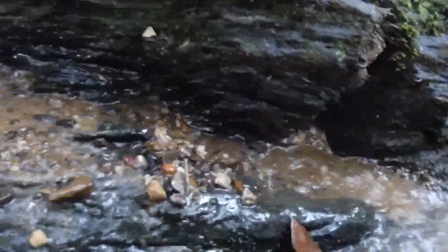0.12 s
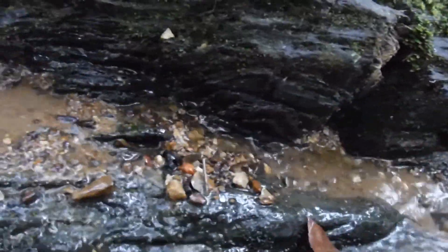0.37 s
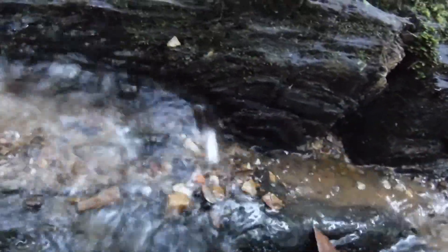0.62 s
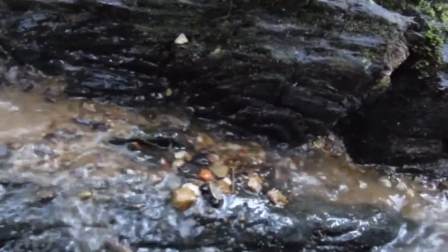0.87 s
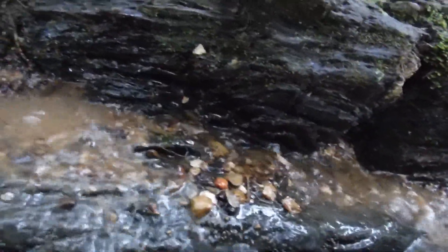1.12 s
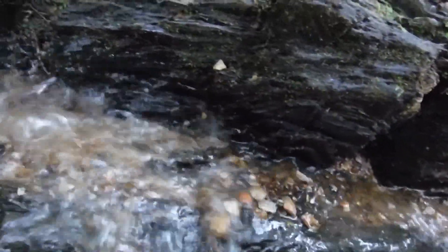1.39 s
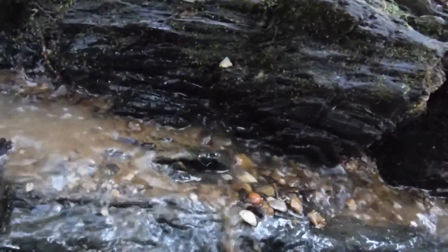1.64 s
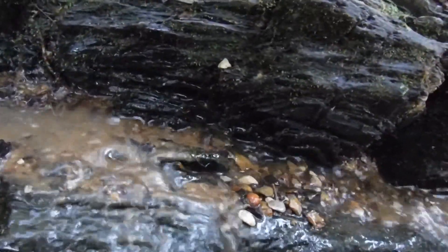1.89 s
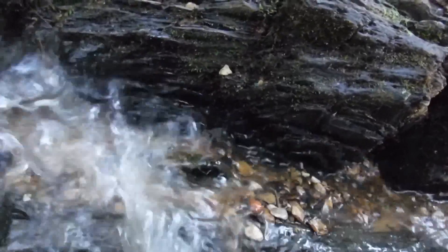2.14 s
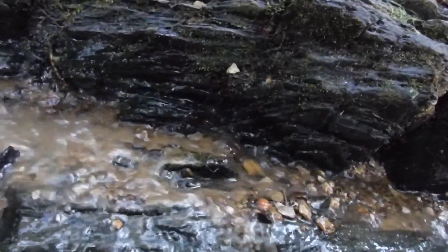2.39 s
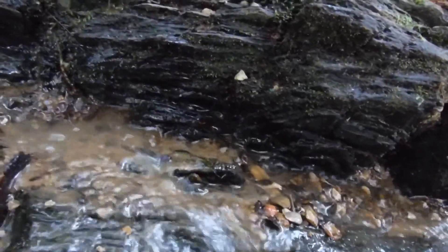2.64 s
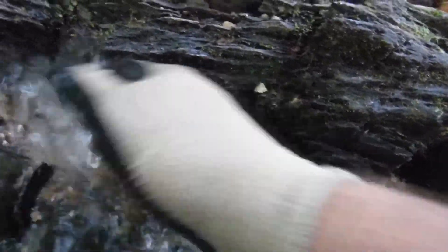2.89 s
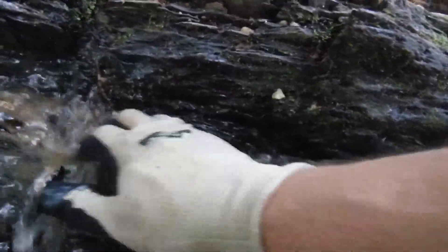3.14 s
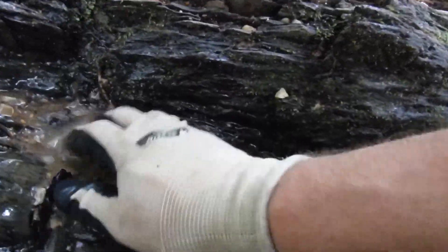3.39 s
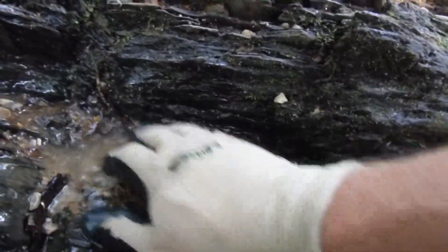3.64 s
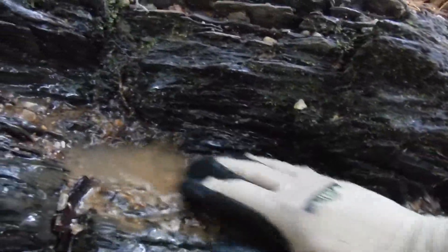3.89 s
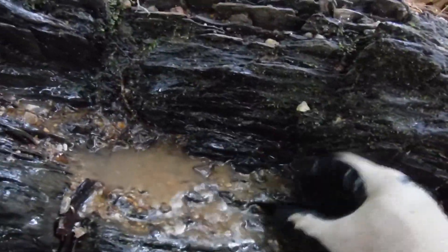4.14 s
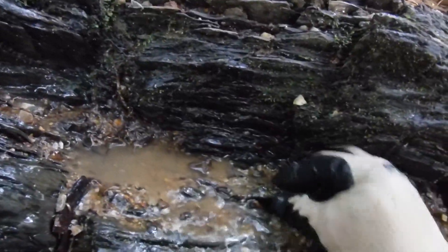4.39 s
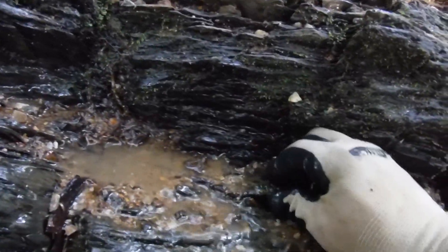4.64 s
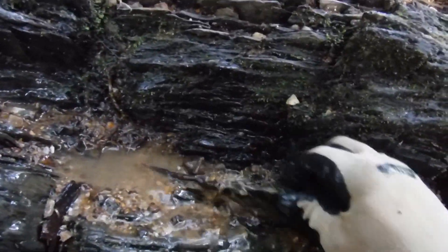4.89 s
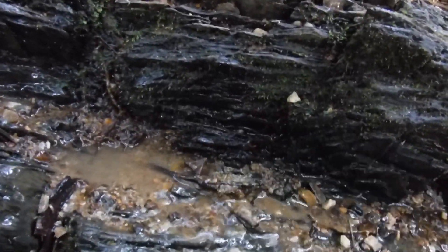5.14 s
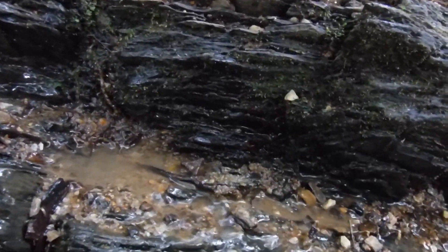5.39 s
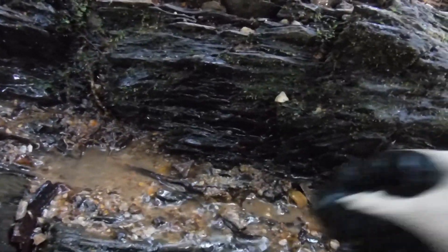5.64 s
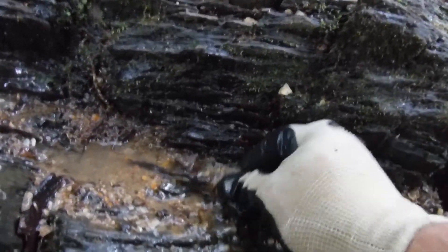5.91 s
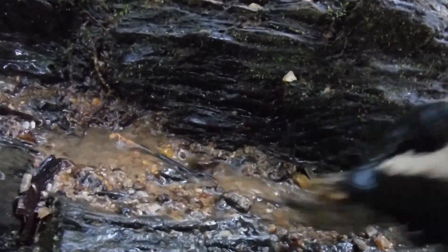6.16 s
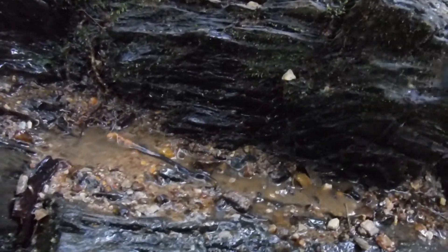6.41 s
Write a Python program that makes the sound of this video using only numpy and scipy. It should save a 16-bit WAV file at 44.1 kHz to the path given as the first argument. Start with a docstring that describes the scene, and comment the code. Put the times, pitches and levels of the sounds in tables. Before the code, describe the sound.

Loud close water splashes in four quick swells with pattering drops and gurgles, then sparse pebble clicks, a wet swish, stone thuds and a thin ping.

```python
"""A shallow creek beside a rock: a gloved hand throws four scoops of water, then rakes through wet gravel.
Noise bursts make the spray patter and wash, and swarms of rising tones make it fizz and gurgle.
Slaps of drops and pebbles clack, trapped air rings as rising bubbles, and narrow noise murmurs and swishes.
Late on, larger stones thud and a thin shard pings with damped modes.
The rock answers the nearest sounds, a low outdoor rumble lies under all, and the input clips at full scale."""
import sys
import numpy as np
from scipy import signal
from scipy.fft import rfft, irfft
from scipy.io import wavfile
from scipy.ndimage import uniform_filter1d, map_coordinates

SR = 44100
rng = np.random.default_rng(int(sys.argv[2]) if len(sys.argv) > 2 else 0)


def waveform_to_disk(signal):
    """Save audio, clipped to [-1, 1], as 16-bit WAV at the path in sys.argv[1]."""
    frames = np.transpose(np.atleast_2d(signal))
    scaled = np.clip(frames, -1, 1) * 32767
    samples = np.round(scaled).astype(np.int16)
    wavfile.write(sys.argv[1], SR, samples)


def volts_from_db(level):
    """Convert decibel levels to linear amplitude ratios."""
    exponent = np.asarray(level, float) / 20
    return 10 ** exponent


N = 287955

# colour of falling spray: (frequency [Hz], level [dB per Hz])
SPRAY_COLOUR = [(300, -28.5), (800, -14.5), (1550, -9), (2240, -5.5), (3170, -5.5), (5100, -1.5),
                (7000, -8.5), (10400, -20), (12500, -34), (15800, -46)]
# strokes of the hand through the water:
# (start [s], fullest [s], end [s], spray level [dB], slosh level [dB])
HAND_STROKES = [(.35, .54, .65, -13, -16), (1.11, 1.29, 1.38, -13.5, -18), (1.88, 2.08, 2.23, -14, -19),
                (2.68, 2.85, 2.9, -8.5, -22), (2.93, 3.0, 3.045, -20, -28), (3.48, 3.51, 3.55, -27, -36),
                (3.84, 3.93, 4.12, -28, -38), (4.29, 4.33, 4.45, -31, -37), (4.68, 4.74, 4.815, -20, -28),
                (4.845, 4.86, 4.96, -31, -30), (5.77, 5.87, 6.0, -27, -38)]


def unit(x):
    """Scaled to rms 1."""
    return x / np.sqrt(np.mean(x ** 2) + 1e-20)


def coloured(x, spectrum):
    """x through the causal minimum-phase filter with the given (frequency [Hz], gain [dB])."""
    size = 2048
    hz, db = np.transpose(spectrum)
    bin_hz = np.fft.rfftfreq(size, 1 / SR)
    log_gain = np.log(volts_from_db(np.interp(np.log(bin_hz + 1), np.log(hz), db)))
    # folding the cepstrum onto positive time makes the filter causal
    cepstrum = irfft(log_gain)
    cepstrum[1:size // 2] *= 2
    cepstrum[size // 2 + 1:] = 0
    impulse = irfft(np.exp(rfft(cepstrum)))
    return signal.fftconvolve(x, impulse)[:N]


def place(start_s, shapes):
    """Sum of the rows of shapes, each starting at its own time."""
    first = np.round(start_s * SR).astype(int)
    at = first[:, None] + np.arange(shapes.shape[1])
    return np.bincount(at.ravel(), shapes.ravel(), N + shapes.shape[1])[:N]


def rings(hz, t60, rise, attack_s, length_s):
    """Damped sines, one a row; a rise above 0 lifts the pitch, as when a bubble nears the surface."""
    t = np.arange(int(length_s * SR)) / SR
    hz, t60, rise = (np.reshape(v, (-1, 1)) for v in (hz, t60, rise))
    cycles = hz * (t + rise * t ** 2 / (2 * t60))
    return np.sin(2 * np.pi * cycles) * volts_from_db(-60 * t / t60) * (1 - np.exp(-t / attack_s))


def random_gains(size, size_db):
    """Gains for uniform random sizes: most are small, a few much larger than the rest."""
    return volts_from_db(-size_db * np.log(np.clip(size, .004, 1)))


def swarm(count, centre_hz, spread, cycles, rise, size_db, attack_s, length_s):
    """Ringing grains at random times, together of rms 1, with log-normal pitch."""
    when, size = rng.random((count, 2)).T
    hz = np.clip(centre_hz * np.exp(spread * rng.standard_normal(count)), 200, 14000)
    grains = rings(hz, cycles / hz, rise, attack_s, length_s)
    return unit(place(when * N / SR, random_gains(size, size_db)[:, None] * grains))


def bursts(count, size_db, t60):
    """Noise of rms 1 that flares where each drop lands and decays by 60 dB in t60 seconds."""
    when, size = rng.random((count, 2)).T
    flare = place(when * N / SR, random_gains(size, size_db)[:, None])
    fade = volts_from_db(-60 * np.arange(SR // 20) / SR / t60)
    return unit(signal.fftconvolve(flare, fade)[:N] * rng.standard_normal(N))


def outdoors():
    """Steady low rumble with a faint hiss of far water, both from one filtered noise."""
    # (frequency [Hz], level [dB per Hz])
    outdoor_colour = [(15, -17), (30, -1), (120, -0.5), (200, -6), (300, -10.5), (600, -18), (1300, -14.5),
                      (2500, -26), (5300, -23), (11000, -34), (15800, -41)]
    return volts_from_db(-42) * unit(coloured(rng.standard_normal(N), outdoor_colour))


def strokes(fullest_db):
    """Gain of the hand's strokes: each plunges in, swells to its fullest, thins out and settles."""
    entry_db, exit_db = -10, -7  # level at a stroke's start and end, relative to its fullest
    plunge_db_per_s, settle_db_per_s = 900, 350  # rise before the start, fall after the end
    now = np.arange(N) / SR
    total = np.zeros(N)
    for (start, full, end), top_db in zip(np.array(HAND_STROKES)[:, :3], fullest_db):
        shape_db = np.interp(now, [start, full, end], [entry_db, 0, exit_db])
        shape_db -= plunge_db_per_s * np.clip(start - now, 0, 1)
        shape_db -= settle_db_per_s * np.clip(now - end, 0, 1)
        total += volts_from_db(top_db + shape_db)
    return total


def clumps():
    """Slow random gain: the thrown spray comes down in lumps."""
    spread_db, clumps_per_s = 3.2, 22
    knots = rng.standard_normal(int(N * clumps_per_s / SR) + 4)
    smooth = map_coordinates(knots, [np.arange(N) * clumps_per_s / SR])
    return unit(volts_from_db(spread_db * smooth))


def stirring():
    """Spray patters and fizzes in the treble; wash and small bubbles gurgle below it."""
    # colour of the low slosh: (frequency [Hz], level [dB per Hz])
    slosh_colour = [(250, -26), (500, -11.5), (900, -5), (1500, 2.5), (2500, -16), (5000, -13.5),
                    (10000, -26), (13000, -46), (15800, -60)]
    # water running back off the rock: (time [s], trickle level [dB])
    runoff = [(0, -24), (.33, -40), (.7, -23), (.94, -26), (1.04, -35), (1.43, -22), (1.72, -28),
              (1.83, -36), (2.27, -25), (2.62, -37), (3.1, -28), (3.3, -33), (3.8, -39), (4.2, -35),
              (4.48, -40), (4.66, -33), (5.02, -46), (5.7, -48), (6.1, -39), (6.53, -47)]
    spray_db, slosh_db = np.transpose(HAND_STROKES)[3:]
    trickle = volts_from_db(np.interp(np.arange(N) / SR, *np.transpose(runoff)))

    patter = unit(coloured(bursts(count=2200, size_db=2.5, t60=0.018), SPRAY_COLOUR))
    fizz = swarm(count=5000, centre_hz=4800, spread=0.3, cycles=50, rise=0.4,
                 size_db=2.2, attack_s=0.00014, length_s=0.013)
    wash = unit(coloured(bursts(count=900, size_db=3.0, t60=0.034), slosh_colour))
    gurgle = swarm(count=1200, centre_hz=1300, spread=0.36, cycles=30, rise=0.7,
                   size_db=3.0, attack_s=0.0012, length_s=0.05)

    spray_gain = strokes(spray_db) * clumps() + trickle
    slosh_gain = strokes(slosh_db) + volts_from_db(-12) * trickle  # a thin trickle holds little low slosh
    spray = spray_gain * (volts_from_db(-2.2) * patter + volts_from_db(-3.5) * fizz)
    slosh = slosh_gain * (volts_from_db(-4.5) * wash + volts_from_db(-2.5) * gurgle)
    return spray + slosh


def clacks():
    """Each slap of a drop or pebble is a rough ring around one pitch with a short wide crack."""
    # (time [s], level before the crack and ring gains [dB], ring pitch at the start [Hz])
    slaps = [(0.0952, -9, 3780), (0.1785, -3, 4560), (0.2264, 0, 5150), (0.2513, -3, 4740),
             (0.2882, -7, 4960), (0.3905, 0, 4320), (0.4, -1, 3250), (0.4444, -4, 4500), (0.5104, 3, 4230),
             (0.5294, 1, 4260), (0.5741, 0, 3780), (0.599, -1, 5590), (0.6689, 2, 6970), (0.6888, -2, 3400),
             (0.7003, 2, 5660), (0.7114, 1, 6670), (0.8854, 0, 4100), (0.8939, 1, 5110), (0.9374, -7, 4710),
             (0.9737, -2, 3170), (0.9971, -9, 4430), (1.063, -2, 3050), (1.1139, 1, 4150),
             (1.1214, 1, 3210), (1.1712, -1, 4880), (1.2401, 0, 5460), (1.261, 0, 4010), (1.3039, 2, 3280),
             (1.3244, 0, 5110), (1.3414, -1, 5010), (1.4047, -3, 4310), (1.4217, 1, 5840),
             (1.496, -1, 4530), (1.5274, -4, 4870), (1.6242, -7, 4350), (1.6716, -2, 2670),
             (1.6935, 1, 5550), (1.726, -2, 5010), (1.8562, -9, 2430), (1.8916, 1, 4440), (1.955, 0, 3640),
             (2.0098, 1, 5170), (2.0472, 0, 3000), (2.0627, 1, 4480), (2.1635, 2, 4900), (2.1864, 1, 2860),
             (2.1989, 1, 4110), (2.2223, -1, 5070), (2.2498, -1, 3910), (2.3241, -5, 5220),
             (2.4882, 1, 4710), (2.5127, 0, 4340), (2.5411, -8, 5220), (2.6753, -3, 4980),
             (2.7292, -4, 4710), (2.7501, -4, 4880), (2.7901, 0, 5130), (2.8185, 3, 6340),
             (2.8399, 3, 5110), (2.8744, 2, 3460), (2.9178, -4, 3150), (2.9372, -2, 4340),
             (2.9811, 0, 5270), (3.0006, 0, 3100), (3.1393, -7, 4300), (3.3657, -8, 3760),
             (3.3857, -2, 2350), (3.4082, -8, 2220), (3.4361, -2, 4030), (3.5937, -1, 3200),
             (3.6775, -11, 4940), (3.7519, -1, 5900), (3.9584, -9, 5170), (4.0382, -14, 5500),
             (4.0522, -11, 4820), (4.6478, -7, 3770), (4.6848, -7, 3790), (4.6974, -6, 3680),
             (4.7247, 1, 3240), (4.7374, 0, 5210), (4.7644, -4, 2860), (4.7975, -6, 5180),
             (4.9447, -9, 4310), (5.1023, -7, 5800), (5.1277, -11, 5780), (5.2285, -21, 6000),
             (5.4086, -13, 4380), (5.4824, -25, 2280), (5.6965, -10, 6190), (5.7389, -13, 6330),
             (5.9284, -1, 3980), (5.9549, -8, 6380), (5.9723, -5, 3870), (5.9904, -9, 4030),
             (6.0407, -13, 5630), (6.1324, -10, 4400)]
    s, db, hz = np.transpose(slaps)
    t60 = .026 * np.exp(.015 * db)  # seconds; bigger slaps last longer
    t = np.arange(int(.04 * SR)) / SR
    noise = rng.standard_normal((len(s), 2, len(t)))
    crack = noise[:, 0] * volts_from_db(db[:, None] - 60 * t / t60[:, None]) * (1 - np.exp(-t / .0006))
    rough = 0.6 + 1.6 * uniform_filter1d(noise[:, 1], size=24, axis=1)
    ring = volts_from_db(db)[:, None] * rough * rings(hz, 1.1 * t60, 0.25, attack_s=0.0005, length_s=0.04)
    return volts_from_db(3.5) * coloured(place(s, crack), SPRAY_COLOUR) + volts_from_db(-1.5) * place(s, ring)


def rock(x):
    """A short diffuse answer from the rock face: x convolved with a delayed, decaying noise tail."""
    t = np.arange(SR // 10) / SR
    tail = rng.standard_normal(len(t)) * volts_from_db(-60 * t / 0.15)
    tail /= np.linalg.norm(tail)
    return signal.fftconvolve(x, np.pad(tail, (60, 0)))[:N]  # delayed by 60 samples


def bubbles():
    """Air pockets closed by the hand ring with a soft start and a rising pitch; big ones ring low and long."""
    # (time [s], level before the pitch tilt [dB], pitch at the start [Hz])
    air_pockets = [(0.358, 0, 1790), (0.379, -5, 1220), (0.465, -7, 727), (0.479, -5, 1290),
                   (0.51, -2, 1160), (0.542, -8, 1130), (0.554, -1, 929), (0.597, -4, 937),
                   (0.719, -20, 964), (0.76, -16, 1180), (0.844, -13, 1190), (0.868, -14, 1750),
                   (1.062, -14, 1390), (1.089, -12, 1450), (1.12, 1, 1630), (1.184, -7, 966),
                   (1.194, -5, 1240), (1.241, -2, 738), (1.263, -3, 398), (1.325, -1, 1390),
                   (1.341, -3, 1770), (1.413, -9, 1670), (1.544, -16, 1640), (1.68, -3, 1960),
                   (1.882, -6, 1840), (1.898, 1, 1110), (2.056, -6, 1150), (2.117, -10, 872),
                   (2.166, -7, 1140), (2.186, -6, 1310), (2.249, -9, 1500), (2.315, -13, 1970),
                   (2.443, -19, 1580), (2.66, -6, 1740), (2.676, -5, 1730), (2.699, -12, 1140),
                   (2.726, -9, 1190), (2.748, -12, 872), (2.904, -15, 611), (2.957, -10, 1410),
                   (3.427, -13, 1880), (3.593, -17, 1910), (4.725, -9, 1640), (4.78, -11, 1310),
                   (4.853, -8, 1660), (4.909, -19, 1310), (5.247, -21, 1190)]
    s, db, hz = np.transpose(air_pockets)
    t60 = 40 / hz  # 40 cycles of the starting pitch
    tones = rings(hz, t60, rise=.45, attack_s=0.0012, length_s=0.11)
    tilt_db = 3.5 * np.log2(hz / 1250)  # low bubbles sound softer, high ones louder
    return place(s, volts_from_db(db + 1.5 + tilt_db)[:, None] * tones)


def swishes():
    """Narrow noise bands: a faint murmur of water at a steady pitch, then two falling swishes of the hand."""
    # (start [s], end [s], level before the carrier at its fullest [dB], pitch at start [Hz], at end [Hz])
    noise_bands = [(4.58, 4.78, -20, 4100, 2900), (4.69, 4.82, -24, 1750, 1300),
                   (3.9, 4.45, -40, 1250, 1250)]
    swell_db, width = 10, .12  # growth over a band; a larger width smooths less and widens the band
    now, total = np.arange(N) / SR, np.zeros(N)
    for start, end, db, from_hz, to_hz in noise_bands:
        pitch_hz = np.interp(now, [start, end], [from_hz, to_hz])
        phase = 2 * np.pi * np.cumsum(pitch_hz) / SR
        smoothing = int(SR / (width * (from_hz + to_hz)))  # samples
        slow_noise = unit(uniform_filter1d(rng.standard_normal(N), size=smoothing))
        level_db = np.interp(now, [start - .02, start, end - .04, end, end + .02],
                             [-120, db - swell_db, db, db - 3, -120])
        total += volts_from_db(level_db) * slow_noise * np.sin(phase)
    return total


def knocks():
    """Larger stones knock together: a dull broad thud of decaying noise with body and no ring."""
    # (time [s], level before colouring and gain [dB])
    stone_hits = [(5.698, -16), (5.738, -13), (5.928, -15), (5.972, -15), (6.007, -20)]
    # (frequency [Hz], level [dB per Hz])
    stone_colour = [(120, -30), (300, -8), (1200, 0), (3000, -5), (9000, -20), (15800, -50)]
    s, db = np.transpose(stone_hits)
    t = np.arange(int(.05 * SR)) / SR
    thud = rng.standard_normal((len(s), len(t))) * volts_from_db(db[:, None] - 60 * t / .035)
    return volts_from_db(4.0) * coloured(place(s, thud), stone_colour)


def shard():
    """A thin hard flake rings with a beating pair of modes until it falls back into the wet."""
    # strikes: (time [s], level [dB], time until water damps it [s])
    strikes = [(6.076, -6, 0.015), (6.098, -26, 0.027), (6.132, -19.5, .04)]
    # modes of the flake: (frequency [Hz], level [dB], decay by 60 dB [s])
    flake_modes = [(4270, -12, 0.11), (4393, -2, 0.09), (7700, -10, 0.063), (8500, -13, 0.043),
                   (11400, -31, 0.071), (12900, -33, .1)]
    hz, mode_db, t60 = np.transpose(flake_modes)
    s, db, free_s = np.transpose(strikes)
    ring = volts_from_db(mode_db) @ rings(hz, t60, 0, attack_s=.0003, length_s=.08)
    t = np.arange(len(ring)) / SR
    damping = volts_from_db(-1500 * np.clip(t - free_s[:, None], 0, None))  # falls 1500 dB per second
    return place(s, volts_from_db(db)[:, None] * ring * damping)


def scene():
    """All sources at one microphone."""
    near = clacks() + bubbles() + knocks() + shard()
    mix = near + volts_from_db(-13) * rock(near) + stirring() + swishes() + outdoors()
    return mix[None]


def band_limit(x):
    """A steep low-pass at the top of the band."""
    return signal.sosfilt(signal.butter(12, 15990, fs=SR, output="sos"), x)


def record(dry):
    """The input clips at full scale with a slightly rounded knee and keeps nothing above its band limit."""
    top_hz = 15950
    clipped = dry / (1 + np.abs(dry) ** 24) ** (1 / 24)
    in_band = np.fft.rfftfreq(N, 1 / SR) < top_hz
    kept = irfft(rfft(clipped) * in_band, N)
    return band_limit(kept)


dry = scene()
out = record(dry)
waveform_to_disk(out)
```